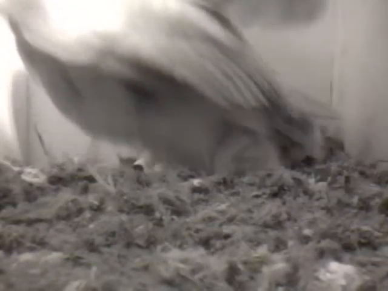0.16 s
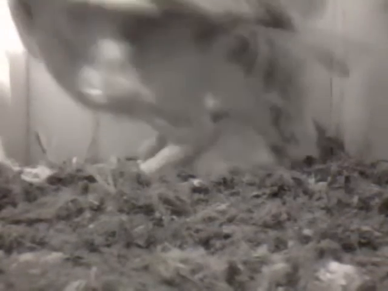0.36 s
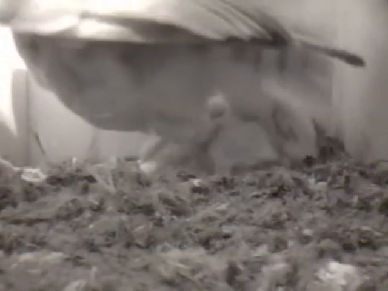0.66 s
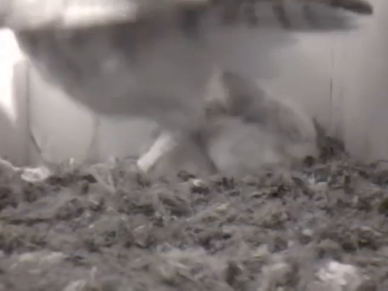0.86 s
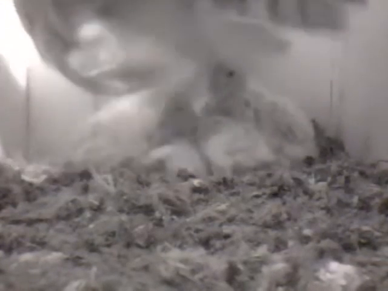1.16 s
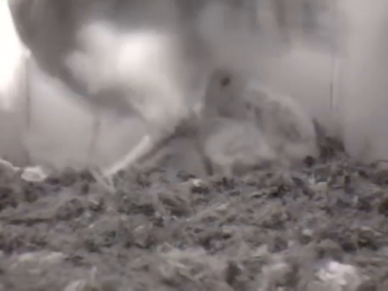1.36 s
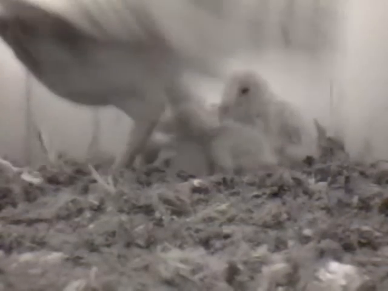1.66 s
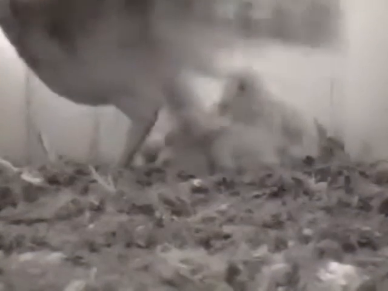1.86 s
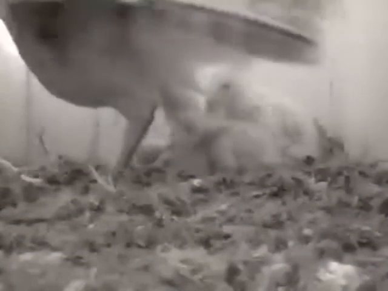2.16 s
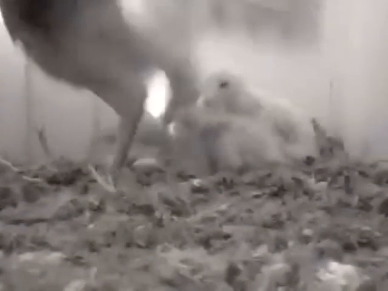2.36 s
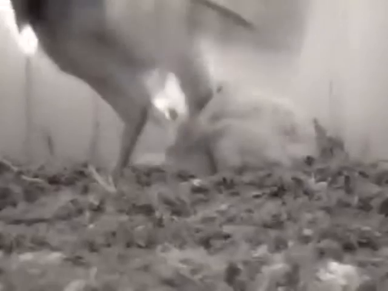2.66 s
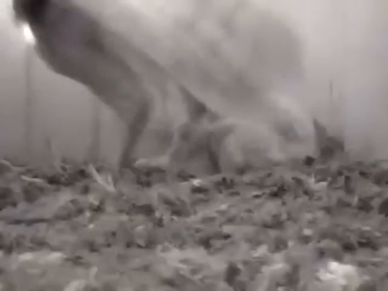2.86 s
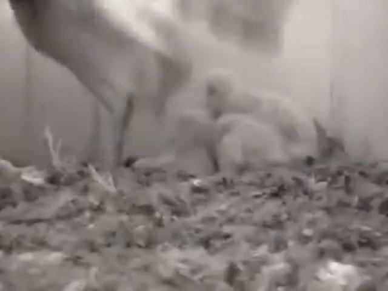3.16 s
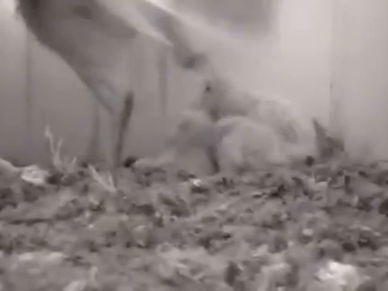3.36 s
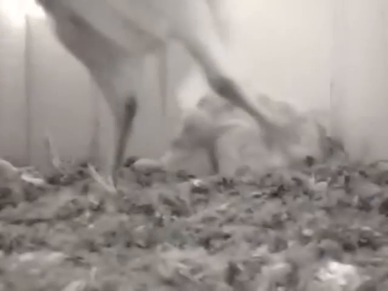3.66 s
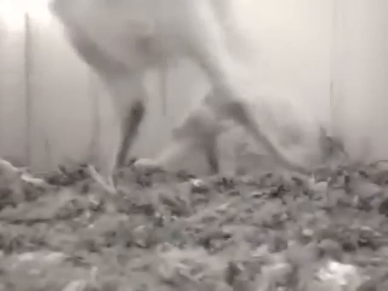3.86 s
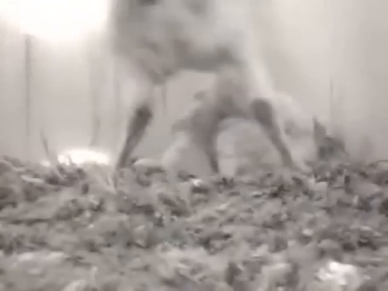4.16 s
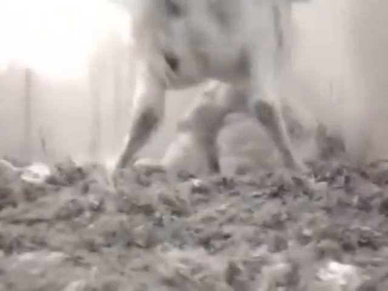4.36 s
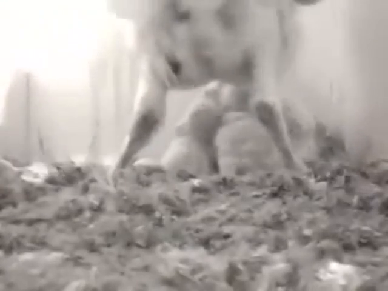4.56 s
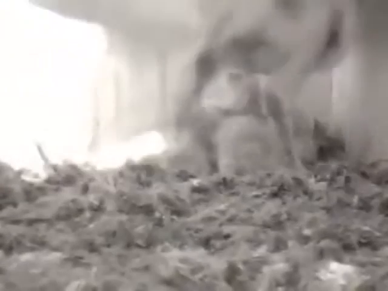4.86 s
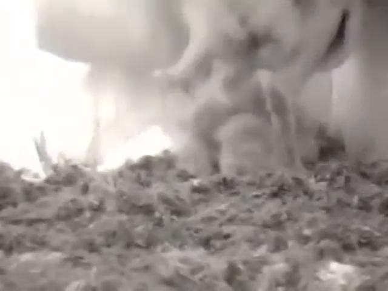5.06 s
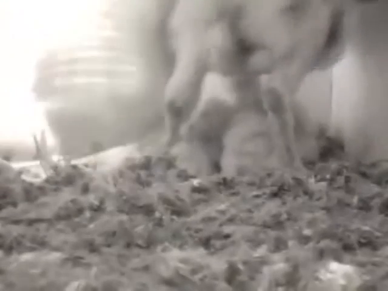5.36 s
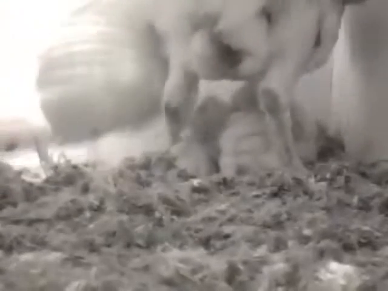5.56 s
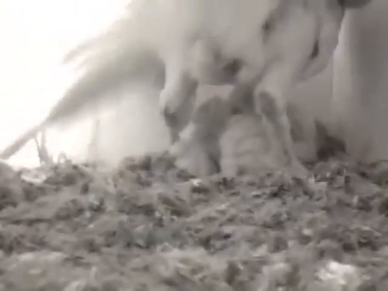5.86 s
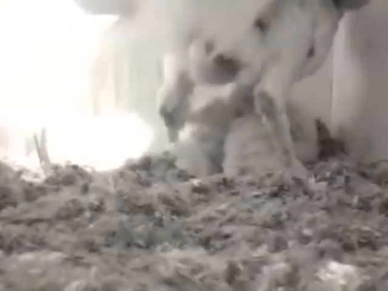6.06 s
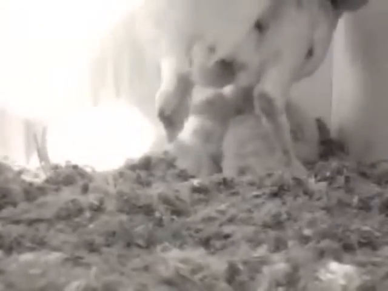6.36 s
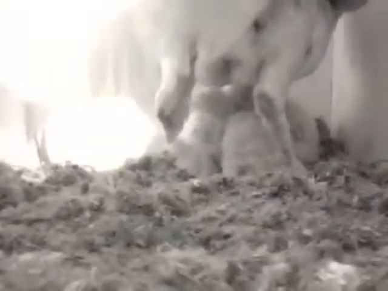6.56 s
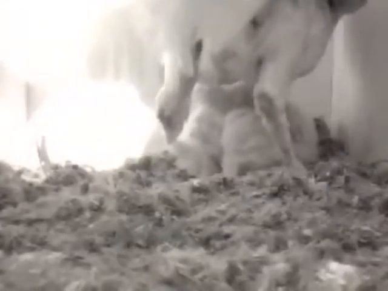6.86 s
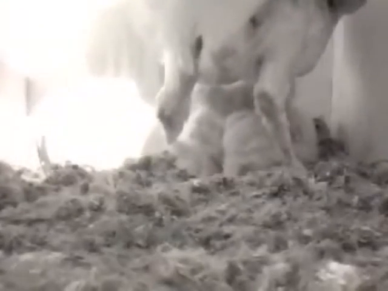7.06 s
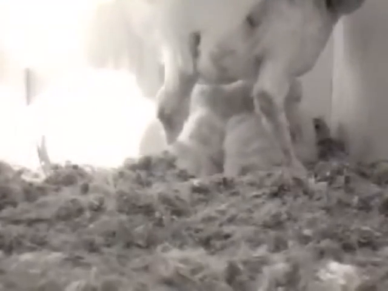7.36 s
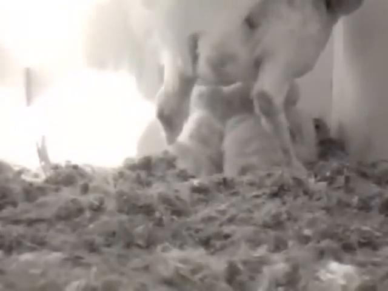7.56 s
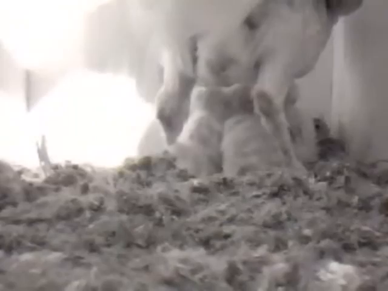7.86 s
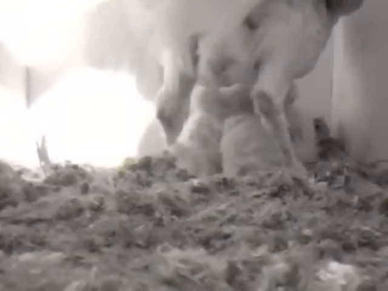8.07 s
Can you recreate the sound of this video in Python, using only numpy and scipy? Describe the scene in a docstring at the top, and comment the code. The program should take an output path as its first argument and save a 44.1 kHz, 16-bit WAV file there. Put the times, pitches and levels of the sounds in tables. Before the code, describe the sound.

Close and boxy: muffled footfalls knock on floor boards, feathers and claws rub the wood, and owl chicks beg with short whistles that scoop up, hold and drop, sometimes turning hoarse. Tiny high squeaks cluster around the middle of the scene. Towards the end the movement quiets and quick dipping chitter notes take over, finishing with a clear whistle, then only low rumble with a faint hum.

```python
"""Inside a wooden nest box an owl steps over its chicks, close to a small microphone.
Begging whistles, low peeps, squeaks and chitter are gliding tones that turn rough when shaken at random.
Feet thud as a push and a scuff ring the floor boards; feathers brush and claws scrape the walls as noise
through resonances. The box colours the voices, and echoes both the voices and the brushes and scrapes,
over a low rumble of filtered noise with a faint hum."""
import sys
import numpy as np
from scipy import signal
from scipy.fft import rfft, irfft, next_fast_len
from scipy.io import wavfile
from scipy.ndimage import uniform_filter1d

SR = 44100
rng = np.random.default_rng(int(sys.argv[2]) if len(sys.argv) > 2 else 0)


def pcm_store(signal):
    """Save signal as 16-bit PCM."""
    levels = np.round(np.clip(np.atleast_2d(signal), -1, 1) * 32767)
    wavfile.write(sys.argv[1], SR, levels.astype(np.int16).T)


N = 362061
TIME = np.arange(N) / SR

# Footfalls. Each row: start in seconds, peak level in dB, centre of the thud in Hz, width of its
# filter in Hz, scuff length in seconds.
FOOTFALLS = [(.463, -40, 187, 350, 0.034), (0.528, -42.5, 356, 400, 0.062), (1.145, -35, 225, 345, 0.053),
             (1.22, -36, 274, 300, 0.051), (1.377, -33.5, 298, 302, 0.055), (1.437, -31, 222, 343, 0.027),
             (1.473, -34, 172, 298, 0.031), (1.746, -40.5, 276, 246, 0.043),
             (1.783, -33.5, 286, 218, 0.053), (1.908, -41.5, 260, 353, .039),
             (2.74, -36.5, 152.8, 112.8, 0.012), (2.893, -40.5, 261, 126, 0.043),
             (3.023, -42, 432, 70, 0.031), (3.227, -45, 256, 199, 0.02), (3.762, -44.5, 266, 150, 0.037),
             (3.972, -37, 216, 364, 0.063), (4.027, -41, 139, 131, .036), (4.363, -30, 240, 433, 0.022),
             (4.439, -43.5, 538, 90, 0.015), (4.736, -29, 165, 246, 0.043), (4.773, -35, 169, 276, 0.048),
             (4.933, -35.5, 298, 159, 0.027), (4.953, -31.5, 320, 157, 0.017),
             (5.029, -41, 441, 79.6, 0.033), (6.833, -40, 193, 152, .019)]
# Wall resonances under a brush or scrape. Each row: pitch in Hz, width in Hz, relative level in dB.
WALL_RESONANCES = [(1417, 200, 5), (2037, 100, -2), (2927, 510, -3), (4000, 180, -10.5), (5170, 740, -16.5)]
# How the box between chick and microphone favours some pitches. Each row: pitch in Hz, gain in dB.
BOX_RESPONSE = [(600, -7.5), (1150, -14.5), (1400, 4), (1520, 5.5), (1670, -6.5), (1820, 3.5), (2000, 6),
                (2300, -6), (2600, -1), (3100, -1.5), (3700, -1.5), (4300, -9.5), (4800, -4.5),
                (7000, -9.5)]


def undb(db):
    """Turn decibels into a gain."""
    return 10 ** (np.asarray(db) / 20)


def unit(x):
    """Scale a sound to an rms level of 1."""
    return x / np.sqrt(np.mean(x ** 2) + 1e-24)


def add(out, s, x):
    """Mix x into out from time s in seconds."""
    i = max(int(s * SR), 0)
    out[i:i + len(x)] += x[:max(N - i, 0)]


def band(x, hz, width):
    """Pass x through one resonance with a gain of 1 at its centre."""
    b, a = signal.iirpeak(hz, hz / width, fs=SR)
    return signal.lfilter(b, a, x)


def flutter(size, hz):
    """Make random motion up to a given rate, with an rms of 1."""
    lowpass = signal.butter(4, hz, fs=SR, output="sos")
    motion = signal.sosfilt(lowpass, rng.standard_normal(size + 2048))
    return unit(motion[-size:])  # leave out the filter's start


def colour(x, points):
    """Filter x through (Hz, dB) points, with no sound ahead of its cause."""
    hz, db = np.transpose(points)
    size = next_fast_len(N + SR // 2) * 2
    f = np.arange(size // 2 + 1) * SR / size
    gain_db = np.interp(np.log(f + 1), np.log(hz), db)
    # folding the cepstrum gives the response that answers soonest (minimum phase)
    cepstrum = irfft(np.log(undb(gain_db)))
    cepstrum[1:size // 2] *= 2
    cepstrum[size // 2 + 1:] = 0
    response = np.exp(rfft(cepstrum))
    return irfft(rfft(x, size) * response)[:N]


def scatter(spans, per_s):
    """Place loosely spaced random events within (start, end, dB) spans, as rows of (s, dB)."""
    rows = []
    for start, end, db in spans:
        count = max(int(round((end - start) * per_s)), 1)
        for k, (u, v) in enumerate(rng.random((count, 2))):
            s = start + (end - start) * (k + u) / count
            rows.append((s, db + 2 * (2 * v - 1)))  # up to 2 dB louder or softer
    return rows


def syrinx(t, hz, rough, overtone_db, third_db=-5, chaos_hz=700, jitter=0.0056, rasp_db=-21,
           undertone_db=-15):
    """A near-pure whistle; when rough, the membrane shakes at random and spreads the tone into a band."""
    size, rough = len(t), np.clip(rough, 0, 1)
    hz = uniform_filter1d(hz, size=440, mode="nearest")
    hz = hz * (1 + jitter * flutter(size, 110))
    phase = 2 * np.pi * np.cumsum(hz) / SR

    chaos = (flutter(size, chaos_hz) + 1j * flutter(size, chaos_hz)) / np.sqrt(2)
    swing = np.sqrt(1 - rough ** 2) + rough * chaos
    # the overtones lose their lock first and smear into noise
    loose = phase + 1.1 * rough * flutter(size, 300)
    overtones = np.exp(2j * loose) + undb(third_db) * np.exp(3j * loose)
    partials = np.exp(1j * phase) + undb(overtone_db) * overtones

    rasp = undb(rasp_db) * rough * unit(band(flutter(size, 10000), 4200, 3000))
    # the shaking is also heard on its own, as a faint low buzz
    low_noise = band(band(rng.standard_normal(size), 660, 220), 660, 220)
    buzz = undb(undertone_db) * rough ** 2 * unit(low_noise)
    edges = np.clip(np.minimum(t - t[0], t[-1] - t) / 0.0013, 0, 1)  # soft start and end
    return (np.imag(swing * partials) + rasp + buzz) * edges


def note(hz, db, rough, overtone_db=-30, quaver=0.022):
    """One short note that swells and fades along a pitch glide; rough ones quaver."""
    size = len(hz)
    swell = np.abs(np.sin(np.linspace(0, np.pi, size))) ** 0.23
    hz = hz * (1 + quaver * rough * flutter(size, 200))
    voice = syrinx(np.arange(size) / SR, hz, rough, overtone_db, third_db=-29.5)
    return undb(db) * swell * voice


def arch(length, first_hz, last_hz, bow):
    """A pitch glide that bows upward in the middle by a share of its pitch."""
    u = np.linspace(0, 1, int(length * SR))
    return (first_hz + (last_hz - first_hz) * u) * (1 + bow * np.sin(np.pi * u))


def background(rumble_db=-61, waver_db=3.0, wall_db=-83, hum_db=-78):
    """Filtered noise rumbles and hisses, wavering near 320 Hz, with mains hum and a faint wall ring."""
    # Spectrum of the steady noise. Each row: pitch in Hz, relative level in dB per Hz.
    rumble_shape = [(18, -59.5), (30, -30.5), (42, -27), (70, -28), (91, 0), (134, -7.5), (181, -2.5),
                    (213, -4), (256, -1.5), (362, -5), (388, -12), (524, -16), (870, -24), (2630, -30),
                    (7430, -38.5), (9660, -62), (16300, -120)]
    noise = undb(rumble_db) * unit(colour(rng.standard_normal(N), rumble_shape))
    wall_hz, wall_width_hz, _ = WALL_RESONANCES[0]
    wall = undb(wall_db) * unit(band(rng.standard_normal(N), wall_hz, wall_width_hz))
    hum = undb(hum_db) * unit(np.sin(2 * np.pi * 60 * TIME))
    waver = band(noise, 320, 310) * (undb(waver_db * flutter(N, 7.9)) - 1)
    return noise + wall + hum + waver


def feathers_and_claws(grain_db=3.0):
    """Feather barbs and claws catch and slip on the wood, ringing the wall."""
    # Feathers brushing and claws scraping the walls. Each row: middle in seconds, half length in
    # seconds, rms level in dB before the swell and the echoes, gain of the upper resonances in dB.
    rubs = [(0.231, 0.0099, -68, 13), (0.485, 0.037, -54.5, 5), (0.56, 0.034, -61.5, 3),
            (0.775, 0.021, -61.5, 10), (1.453, 0.038, -52, -13), (1.483, 0.025, -53.5, 3),
            (1.752, 0.0083, -61, -17), (1.923, 0.009, -62.5, -25), (2.932, 0.038, -58.5, -11.5),
            (3.45, 0.34, -77, -2.5), (4.369, 0.0029, -52, -20), (4.983, 0.038, -60, -13.5),
            (5.048, .015, -55, -4.5), (5.15, 0.029, -49, -7), (5.24, .05, -52, 1.5)]
    # claws graze the wood as a foot lands: rms before the swell and echoes, against the step's peak
    claw_db, claw_treble_db = -36.5, -12
    out = np.zeros(N)
    claws = [(s + length / 2, length / 2, db + claw_db, claw_treble_db)
             for s, db, _, _, length in FOOTFALLS]
    for s, half, db, treble_db in rubs + claws:
        t = np.arange(-3 * half, 3 * half, 1 / SR)
        slips = rng.standard_normal(len(t)) * undb(grain_db * flutter(len(t), 170))
        low, *high = (undb(gain_db) * band(band(slips, hz, width), hz, width)
                      for hz, width, gain_db in WALL_RESONANCES)
        rub = unit(low + undb(treble_db) * sum(high))
        swell = np.exp(-np.abs(t / half) ** 1.92 / 2)
        add(out, s + t[0], undb(db) * rub * swell)
    return out


def steps(grit=0.1, push_s=0.0012, low_hz=85, high_hz=470):
    """A foot pushes the boards, then scuffs; where it lands decides which board tones speak."""
    # Tones of the floor boards. Each row: pitch in Hz, time to fade by 60 dB in seconds,
    # relative level in dB.
    boards = [(103, .1, -28.5), (148.5, 0.08, 4.5), (174, 0.06, 1), (245, 0.047, -2.5), (287.1, 0.06, 7),
              (310, 0.1, -3.5), (428, 0.11, -21), (561, 0.089, -11)]
    # Light random shuffling. Each row: start in seconds, end in seconds, middle peak level in dB.
    shuffle_spans = [(.37, .66, -46), (1.55, 1.72, -45), (2.78, 3.7, -46.5), (5.12, 5.35, -46)]
    shuffle_per_s, shuffle_hz, shuffle_width_hz, shuffle_s = 7, 269, 280, 0.03
    # a firm step has this share of scuff; lighter ones have more (dB per dB)
    firm_db, firm_scuff, scuff_slope = -30.5, .28, 0.23
    out, t = np.zeros(N), np.arange(SR // 3) / SR
    ring = sum(undb(db - 60 * t / t60) * np.sin(2 * np.pi * hz * t) for hz, t60, db in boards)
    # small boards radiate no deep bass, and the litter muffles the top
    muffle = signal.butter(3, [low_hz, high_hz], "band", fs=SR, output="sos")
    ring = signal.sosfilt(muffle, ring)
    push = t / push_s * np.exp(-t / push_s)
    shuffles = [(s, db, shuffle_hz, shuffle_width_hz, shuffle_s)
                for s, db in scatter(shuffle_spans, shuffle_per_s)]
    for s, db, hz, width, length in FOOTFALLS + shuffles:
        scuff = firm_scuff * undb(scuff_slope * (firm_db - db))
        scrape = rng.standard_normal(len(t)) * np.exp(-(t / length) ** 2)
        force = push / push.sum() + grit * scuff * scrape
        thud = signal.fftconvolve(force, ring)[:len(t)]
        thud = band(band(thud, hz, width), hz, width)
        add(out, s, undb(db) * thud / np.abs(thud).max())
    return out


def twitter(wander=0.23):
    """Low peeps, thin squeaks and squabbles are short whistles whose glide bows upward."""
    # Low peeps. Each row: start in seconds, length in seconds, pitch at the ends in Hz,
    # upward bow as a share of pitch, level in dB before the box.
    peeps = [(0.417, .048, 1531, .27, -43.5), (6.002, 0.0093, 1787, 0.033, -44),
             (6.579, .18, 2148, .03, -64)]
    # Squeaks. Each row: start in seconds, length in seconds, first pitch in Hz, last pitch in Hz,
    # level in dB before the box, roughness (the voice treats anything above 1 as 1).
    squeaks = [(0.468, 0.032, 5100, 4730, -47, 0.16), (0.554, 0.015, 4700, 4400, -54, .1),
               (2.854, .027, 5060, 4200, -50, 0.17), (2.885, 0.062, 4490, 4660, -43.5, 0.06),
               (4.03, 0.036, 4370, 4930, -47.5, 0.34), (4.029, 0.028, 6000, 7130, -48, 1.2),
               (4.103, 0.03, 6700, 4920, -51.5, 0.54), (4.076, 0.021, 4770, 4550, -55.5, 0.4),
               (4.111, 0.024, 4090, 3350, -56.5, 0.5), (4.367, 0.022, 4450, 4400, -53.5, 0.14),
               (4.392, 0.045, 6050, 5400, -46.5, 0.6), (4.419, 0.027, 3406, 3430, -46, 0.54),
               (4.441, 0.034, 4520, 5700, -53, 0.34), (4.502, 0.018, 5150, 3270, -43.5, 0.26),
               (4.526, 0.024, 3660, 3950, -59, 0.1), (4.58, 0.014, 4770, 3300, -55, .2),
               (5.02, 0.047, 4210, 3300, -57, 0.17), (4.954, 0.023, 3630, 3500, -52.5, 0.28),
               (4.992, 0.022, 3560, 4570, -53, 0.24), (5.101, .06, 5400, 3300, -53.5, 0.4),
               (5.189, 0.062, 5320, 3790, -50.5, 0.3), (5.301, 0.028, 5270, 4290, -51, 0.3),
               (5.307, 0.046, 5180, 4580, -55, 0.1), (5.029, 0.012, 6100, 5400, -57, .2),
               (6.349, 0.038, 4440, 4280, -53, 0.17), (6.753, 0.026, 5000, 3800, -48, 0.27)]
    # The chicks squabble in faint random squeaks. Each row: start in seconds, end in seconds,
    # middle level in dB before the box.
    squabbles = [(4.43, 4.6, -52.5), (5.02, 5.1, -64)]
    peep_rough, peep_overtone_db, squeak_bow = .2, -11.5, .06
    squabble_per_s, squabble_hz, squabble_note_s = 30, 4400, 0.026
    out = np.zeros(N)
    for s, length, hz, bow, db in peeps:
        add(out, s, note(arch(length, hz, hz, bow), db, peep_rough, peep_overtone_db))
    for s, length, first, last, db, rough in squeaks:
        add(out, s, note(arch(length, first, last, squeak_bow), db, rough))
    for s, db in scatter(squabbles, squabble_per_s):
        first, last = squabble_hz * np.exp(wander * rng.standard_normal(2))
        glide = arch(squabble_note_s, first, last, squeak_bow)
        add(out, s - squabble_note_s / 2, note(glide, db, rough=.3))
    return out


def chitter():
    """A run of like notes that dip and rise in pitch; the loud ones begin with a soft catch."""
    # Chitter notes. Each row: start in seconds, fall in seconds, rise in seconds, lowest pitch in Hz,
    # level in dB before the box, roughness 0-1. A rise near 0 cuts the note off at the bottom.
    chitter_notes = [(5.78, .019, 0.011, 3890, -42.5, .07), (5.882, 0.019, .05, 3420, -40, 0.37),
                     (5.975, 0.026, 0.034, 3180, -39.5, 0.22), (6.285, 0.03, 0.0013, 3120, -48.5, .1),
                     (6.377, 0.028, 0.00046, 3300, -46.5, 0.12), (6.463, 0.039, 0.033, 3450, -42, 0.06),
                     (6.587, 0.023, 0.031, 3290, -35.5, .05), (6.687, 0.026, .028, 3305, -37, .06)]
    first_hz, last_hz = 4570, 4860
    # a soft catch of the voice just before each note above loud_db
    catch_s, catch_hz, catch_db, loud_db = 0.013, 3750, -10.5, -41
    out = np.zeros(N)
    for s, fall, rise, low_hz, db, rough in chitter_notes:
        t = np.arange(0, fall + rise, 1 / SR)
        glide = np.interp(t, [0, fall, fall + rise], [first_hz, low_hz, last_hz])
        add(out, s, note(glide, db, rough))
        if db > loud_db:
            catch = np.full(int(catch_s * SR), catch_hz)
            add(out, s - catch_s, note(catch, db + catch_db, rough))
    return out


def begging(voice_db=2.0, scoop_bend=1.9, drop_bend=1.3):
    """Long whistles scoop up, hold and drop as the membrane slackens, breaking into rasps on the way."""
    # Held part of each call, one list per call. Each row: time in seconds, pitch in Hz,
    # level at the microphone in dB before voice_db and the trim.
    holds = [
        [(1.192, 2280, -58), (1.212, 2400, -51.5), (1.274, 2090, -50), (1.312, 2233, -57), (1.366, 2069, -49.5),
         (1.466, 2160, -46), (1.48, 2250, -52.5), (1.535, 2165, -49.5)],
        [(2.468, 1850, -36.5), (2.486, 1797, -36), (2.498, 1590, -38.5), (2.528, 1489, -36),
         (2.57, 1947, -38.5), (2.644, 2031, -30), (2.69, 1923, -40.5)],
        [(4.47, 2004, -45), (4.538, 1952, -39), (4.57, 2022, -47), (4.594, 2130, -40), (4.612, 2261, -52.5),
         (4.652, 2475, -42.5), (4.696, 2383, -51.5), (4.705, 2110, -48)],
        [(5.645, 2220, -47.5), (5.663, 2395, -49.5), (5.691, 2180, -44), (5.803, 2450, -43),
         (5.837, 2550, -37.5), (5.893, 2670, -37.5), (5.905, 2520, -43)],
        [(6.793, 2130, -39), (6.817, 2126, -37), (6.855, 2050, -35.5), (6.901, 2123, -34.5), (6.935, 2250, -46),
         (6.945, 2237, -43.5), (6.995, 2325, -50.5), (7.01, 2197, -41)],
    ]
    # The same calls in turn. Each row: scoop in seconds, drop in seconds, opening pitch in Hz,
    # opening level in dB, drop level in dB (both before the box), trim of the held part in dB,
    # base level of the second partial in dB, third partial against the second in dB.
    call_shapes = [(.034, 0.039, 1520, -48, -45, -1, -5.5, -2.5),
                   (.032, .046, 1370, -36.5, -35, -.5, -13.5, -6),
                   (0.03, .047, 1500, -36.5, -39.5, 0.5, -7, -9.5),
                   (.033, 0.046, 1500, -36.5, -33.5, 0, -13, -17),
                   (.031, 0.046, 1800, -42.5, -38, -0.1, -17.5, -13)]
    # Where a call breaks into a rasp. Each row: start in seconds, end in seconds, roughness 0-1.
    rasps = [(1.153, 1.182, 0.54), (1.421, 1.567, 0.25), (4.44, 4.454, 0.52), (4.69, 4.733, 0.77),
             (5.641, 5.726, 0.46), (5.839, 5.926, 0.33), (6.926, 7.013, 0.42)]
    slack_hz = 1361  # every begging call drops to this pitch
    accent_s, fade_s, fade_db = .009, 0.025, -13.5  # the opening accent's peak; the fade at the end
    held_rough, slack_rough = 0.02, 0.18  # roughness of the held whistle; extra at its slack ends
    break_s, rasp_dull_db = .008, -7.5  # time to slip in or out of a rasp; overtone loss at roughness 1
    tremble_db, tremble_hz = 1.5, 70  # the voice trembles in level
    out = np.zeros(N)
    box_hz, box_db = np.transpose(BOX_RESPONSE)
    for hold, shape in zip(holds, call_shapes):
        scoop_s, drop_s, first_hz, open_db, drop_db, trim_db, overtone_db, third_db = shape
        s, held_hz, heard_db = np.transpose(hold)
        start, end = s[0] - scoop_s, s[-1] + drop_s
        t = np.arange(start, end, 1 / SR)
        scoop = 1 - np.clip((t - start) / scoop_s, 0, 1) ** scoop_bend
        drop = np.clip((t - s[-1]) / drop_s, 0, 1) ** drop_bend
        hz = np.interp(t, s, held_hz) * (1 - scoop - drop) + first_hz * scoop + slack_hz * drop

        # effort at the beak, before the box favours some pitches
        box_gain_db = np.interp(np.log(held_hz), np.log(box_hz), box_db)
        effort_db = heard_db + voice_db + trim_db - box_gain_db
        db = np.interp(t, [start, start + accent_s, *s, end - fade_s, end],
                       [open_db - 7, open_db, *effort_db, drop_db, drop_db + fade_db])
        db = db + tremble_db * flutter(len(t), tremble_hz)

        rough = held_rough + slack_rough * (scoop + drop) ** 2
        for a, b, harsh in rasps:
            inside = np.clip(.5 + np.minimum(t - a, b - t) / break_s, 0, 1)
            rough = np.maximum(rough, harsh * inside)
        # a slack membrane beats harder: more overtones at low pitch
        slack_db = 11 * np.log2(2000 / hz)
        bright_db = overtone_db + slack_db + rasp_dull_db * np.sqrt(rough)
        add(out, start, undb(db) * syrinx(t, hz, rough, bright_db, third_db))
    return out


def nest_box(x, wet_db=-19):
    """Close walls give a few quick echoes, which make glides ripple, and a very short ring."""
    # First reflections off the walls. Each row: delay in seconds, gain as a plain factor.
    reflections = [(.0021, 0.058), (.0047, 0.2), (.0079, .15)]
    t = np.arange(SR // 6) / SR
    t60 = .1  # seconds for the ring to fade by 60 dB
    tail = rng.standard_normal(len(t)) * undb(-60 * t / t60)
    echoes = sum(gain * np.interp(TIME - delay, TIME, x) for delay, gain in reflections)
    ring = signal.fftconvolve(x, tail / np.linalg.norm(tail))[:N]
    return x + echoes + undb(wet_db) * ring


def scene():
    """Coloured voices, brushes and scrapes echo in the box; steps and background join directly."""
    voices = begging() + twitter() + chitter()
    inside = colour(voices, BOX_RESPONSE) + feathers_and_claws()
    return (nest_box(inside) + steps() + background())[None]


def record(dry, top_hz=7200, hiss_db=-96):
    """The microphone passes only sound below a steep upper limit and adds a trace of hiss."""
    lowpass = signal.butter(12, top_hz, fs=SR, output="sos")
    narrow = signal.sosfiltfilt(lowpass, dry)
    return narrow + undb(hiss_db) * flutter(N, 11000)


dry = scene()
out = record(dry)
pcm_store(out)
```